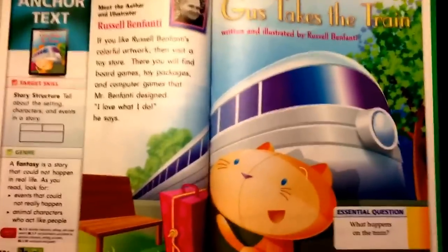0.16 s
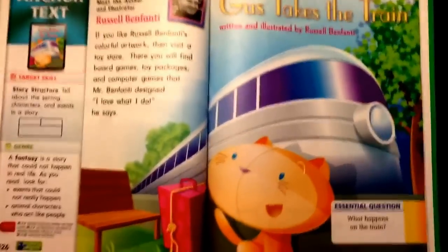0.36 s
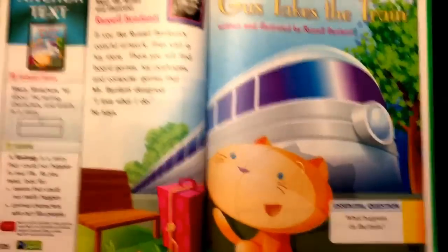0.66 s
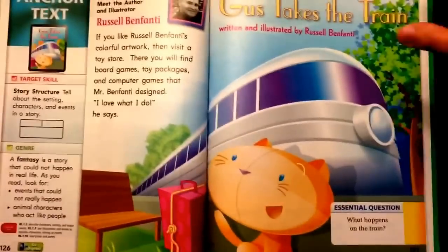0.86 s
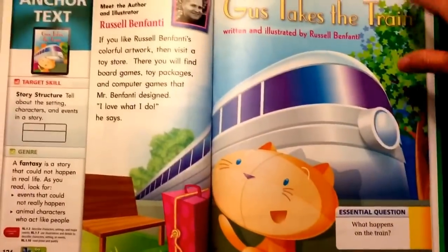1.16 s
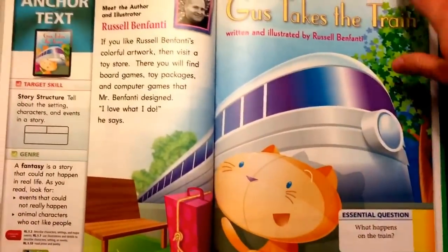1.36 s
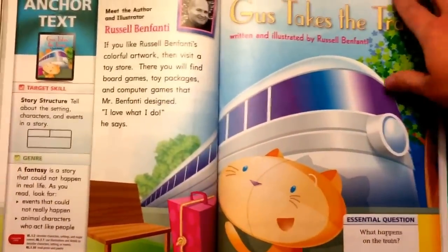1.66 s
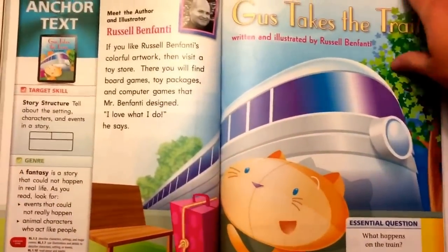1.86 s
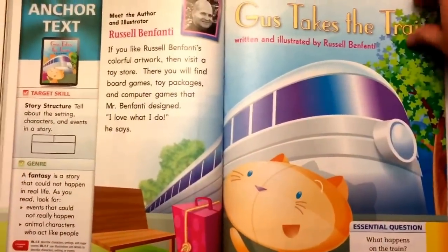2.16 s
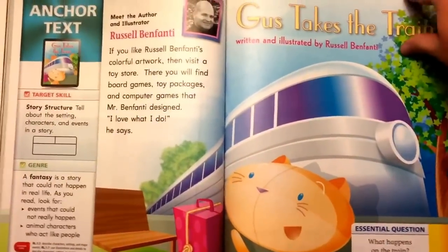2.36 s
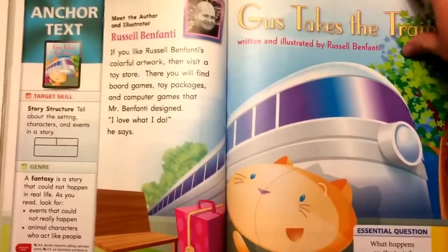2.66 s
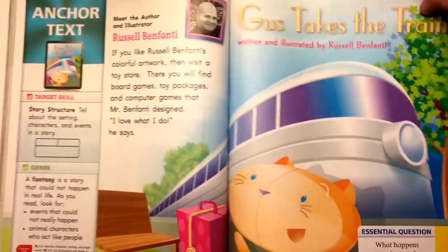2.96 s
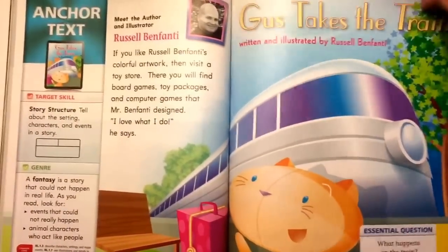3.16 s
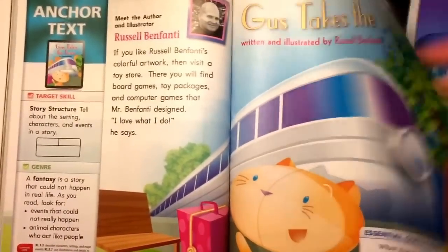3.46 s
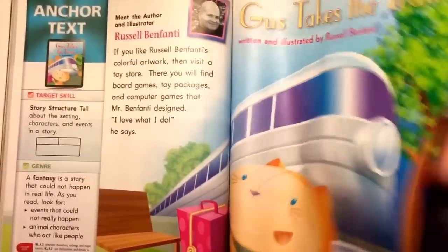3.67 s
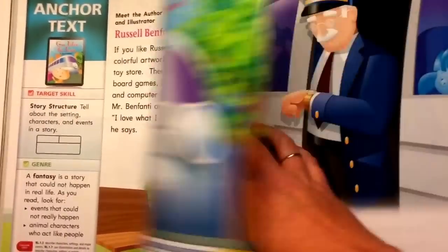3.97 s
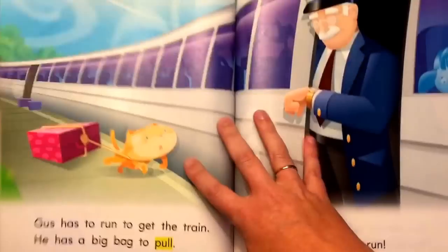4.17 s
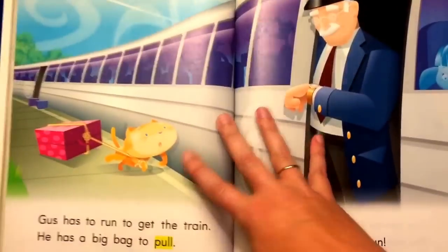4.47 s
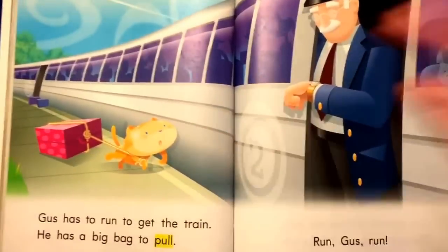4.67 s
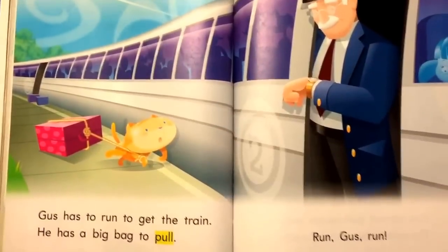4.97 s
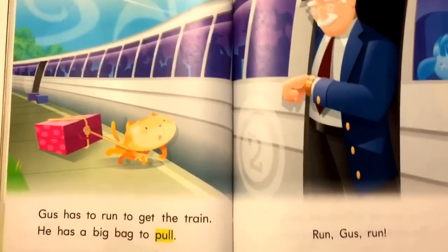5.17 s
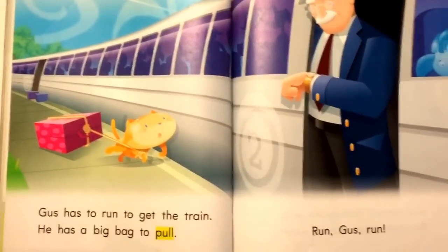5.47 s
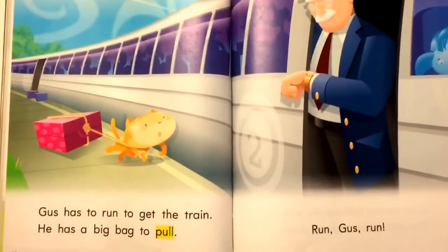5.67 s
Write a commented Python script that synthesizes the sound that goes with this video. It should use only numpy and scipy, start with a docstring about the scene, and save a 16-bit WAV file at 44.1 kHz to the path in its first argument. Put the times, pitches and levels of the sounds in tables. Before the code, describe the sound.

In a quiet room, fingers tap and rub a book, then one glossy page lifts, crackles and swings over with dull air whumps.

```python
"""A low rumble and a faint hum of a quiet room come first, with soft handling bumps and one dry knock.
Close to a hand-held camera, fingers then flick, tap and rub a schoolbook, and one glossy page is turned:
it lifts, buckles, swings over with two dull whumps of air and lands, and the palm smooths it and lets go;
the casing creaks near the end. Paper is crackling noise shaped by sheet and rubbing spectra, the book
damped modes, the thuds short low sines, the rumble filtered noise and the hum a sine."""
import sys
import numpy as np
from scipy import signal
from scipy.fft import rfft, irfft
from scipy.io import wavfile
from scipy.ndimage import map_coordinates

SR = 44100
rng = np.random.default_rng(int(sys.argv[2]) if len(sys.argv) > 2 else 0)


def bounce(signal):
    """Save signal as a 16-bit WAV file at the path given by the first command-line argument."""
    frames = np.transpose(np.atleast_2d(signal))
    limited = np.clip(frames, -1, 1)
    pcm = np.round(limited * 32767).astype(np.int16)
    wavfile.write(sys.argv[1], SR, pcm)


N = 256220
TIME = np.arange(N) / SR  # s

# resonances of the flat sheet at rest: frequency_hz, relative_density_db
SHEET_SPECTRUM = [(50, -14.5), (170, -14.5), (320, -18.5), (470, -19.5), (750, -11.5), (1200, -7.5),
                  (1600, -4), (1950, -1), (2650, -5.5), (3200, -16), (4000, -24), (7000, -39),
                  (11000, -51.5), (16000, -57)]
# hiss of rubbed paper: frequency_hz, relative_density_db
RUB_SPECTRUM = [(100, -21.5), (250, -13.5), (470, -19), (800, -10.5), (1400, -16), (2700, -11.5),
                (3700, -17.5), (5000, -5.5), (6500, 0.5), (8300, -1.5), (10100, -16.5), (12500, -13.5),
                (16000, -17.5)]
SHEET_HZ, RUB_HZ = 1900, 6500  # reference pitches of the two spectra


def undb(db):
    """Decibels to gain."""
    return 10 ** (np.asarray(db) / 20)


def add(track, start, sound):
    """Mix a sound into the track from a given time in seconds."""
    i = max(int(start * SR), 0)
    track[i:i + len(sound)] += sound[:N - i]


def walk(n, rate):
    """A smooth random wander with a spread near 1, taking rate steps a second."""
    steps = rng.standard_normal(2048)
    return np.interp(np.arange(n) * rate / SR, np.arange(len(steps)), steps)


def swell(peak, rise_ms, fall_ms):
    """Start time and envelope of an exponential rise and fall, 20 dB in each given time."""
    rise, fall = rise_ms / 1000, fall_ms / 1000
    t = np.arange(-2 * rise, 2 * fall, 1 / SR)
    return peak + t[0], undb(20 * np.minimum(t / rise, -t / fall))


def colour(x, points, stretch=1, ripple_db=0, ripple_hz=170, size=2048):
    """Causal filter of unit energy; stretch shifts its spectrum, ripple scatters resonances over it."""
    hz, db = np.transpose(points)
    f = np.maximum(np.arange(size // 2 + 1) * SR / size, 1)
    ripple = np.interp(f / ripple_hz, np.arange(size), rng.standard_normal(size))
    gain_db = np.interp(np.log(f), np.log(hz * stretch), db) + ripple_db * ripple
    # folding the cepstrum forward gives minimum phase: the response starts at once
    cepstrum = irfft(np.log(undb(gain_db)))
    cepstrum[1:size // 2] *= 2
    cepstrum[size // 2 + 1:] = 0
    response = irfft(np.exp(rfft(cepstrum)))
    return signal.fftconvolve(x, response / np.linalg.norm(response))


def crackle(envelope, rate, spread_db):
    """Tiny slips of uneven size at random moments, rate a second, with the energy of the envelope."""
    n = len(envelope)
    signs = rng.choice([-1, 1], n)
    sizes = signs * undb(spread_db * np.minimum(rng.exponential(size=n), 4))
    happens = rng.random(n) < rate / SR
    faint_noise = 1e-3 * rng.standard_normal(n)
    slips = envelope * (sizes * happens + faint_noise)
    return slips * np.linalg.norm(envelope) / np.linalg.norm(slips)


def patches(envelope, points, stretch, rate, spread_db, uneven_db, ripple_db, flutter_hz=100, count=3):
    """Patches of paper crackle in turns, each with its own resonances; the energy follows the envelope."""
    weights = [envelope * undb(uneven_db * walk(len(envelope), flutter_hz)) for _ in range(count)]
    share = np.linalg.norm(envelope) / np.linalg.norm(weights)
    return share * sum(colour(crackle(w, rate, spread_db), points, stretch, ripple_db) for w in weights)


def background(tone_db=-61.5, waver_db=3.0, split_hz=220, hum_hz=259.5, hum_db=-74):
    """Wavering building rumble, smooth thin hiss and the slightly wandering hum of an appliance."""
    # room tone: frequency_hz, relative_density_db
    tone_spectrum = [(20, -41), (31, -26.5), (42, -12), (58, -1), (90, -1), (120, -12), (160, -9.5),
                     (205, -15.5), (275, -17.5), (400, -27.5), (800, -33.5), (2200, -35), (7500, -41),
                     (16000, -47)]
    tone = undb(tone_db) * colour(rng.standard_normal(N), tone_spectrum, size=16384)[:N]
    rumble = signal.sosfiltfilt(signal.butter(2, split_hz, fs=SR, output="sos"), tone)
    hiss = tone - rumble
    hum_gain = undb(hum_db + 1.3 * walk(N, rate=5)) * np.sqrt(2)  # from rms to peak
    hum = hum_gain * np.sin(2 * np.pi * hum_hz * TIME)
    return hiss + rumble * undb(waver_db * walk(N, rate=11)) + hum


def thuds(cycles=0.79):
    """Short low thuds: soft handling bumps, and two dull whumps of air pushed by the turning page."""
    # handling bumps, and page whumps at 3.385 and 3.666 s: centre_s, envelope_peak_db, pitch_hz
    low_thuds = [(.115, -49, 131), (.293, -46, 71), (0.543, -41.5, 54.6), (1.748, -48, 93),
                 (3.385, -42, 149), (3.666, -40.5, 165), (5.05, -51, 60)]
    out = np.zeros(N)
    for centre, db, hz in low_thuds:
        t = TIME - centre
        envelope = np.exp(-(t * hz / cycles) ** 2)  # leaves a cycle or two
        out += undb(db) * envelope * np.sin(2 * np.pi * hz * t)
    return out


def knock(at=.358, db=-38, rise_ms=2.3, fall_ms=3, note_hz=1000, note_db=-42, note_t60=0.035):
    """One dry handling click, bright on top, with a short hollow note decaying 60 dB in note_t60 s."""
    # the dry knock: frequency_hz, relative_density_db
    knock_spectrum = [(300, -3), (480, -15), (750, -6), (1000, -2), (1350, -12), (2150, -11), (3500, -3.5),
                      (4400, -8), (5200, -14), (6800, -1.5), (8800, 2), (11000, -9), (12500, -20),
                      (16000, -23)]
    out, t = np.zeros(N), TIME[:SR // 10]
    start, force = swell(at, rise_ms, fall_ms)
    add(out, start, undb(db) * colour(crackle(force, rate=14000, spread_db=2.0), knock_spectrum))
    note = np.exp(-np.log(1000) * t / note_t60) * np.sin(2 * np.pi * note_hz * t)
    add(out, at, undb(note_db) * note)
    return out


def ticks(scrape_hz=6350, rise_ms=3.5):
    """A nail or page edge catches and slips free in a brief scrape that also shakes the sheet."""
    # catches and flicks: peak_s, level_db, fall_by_20_db_ms, sheet_relative_to_scrape_db
    flicks = [(.528, -68, 10, -14), (1.556, -54, 6, -27), (1.617, -70, 6, 8), (1.882, -41, 3, -14),
              (2.0672, -38.5, 8, -2), (2.4629, -47.5, 13, -4.5), (2.62, -49, 5, 0), (2.83, -48.5, 24, -0.5),
              (2.962, -35, 40, -14), (3.283, -52, 4, 4), (3.581, -52, 8, -2), (3.8367, -37, 5.5, -5.5),
              (4.508, -49, 1.5, 1)]
    out = np.zeros(N)
    for peak, db, fall_ms, sheet_db in flicks:
        start, force = swell(peak, rise_ms, fall_ms)
        scrape = colour(crackle(force, rate=14000, spread_db=3.5), RUB_SPECTRUM, stretch=scrape_hz / RUB_HZ)
        sheet = colour(crackle(force, rate=7800, spread_db=-0.5), SHEET_SPECTRUM, stretch=1.033)
        add(out, start, undb(db) * (scrape + undb(sheet_db) * sheet))
    return out


def taps(contact_s=0.0019, pitch_scatter=.02):
    """A soft fingertip rings the damped modes of the book, a little differently at each tap."""
    # fingertips land on the block of pages: start_s, peak_db
    landings = [(1.588, -53.5), (1.615, -58), (1.988, -52.5), (2.068, -45.5), (2.095, -52.5),
                (2.481, -39.5), (2.506, -50), (2.619, -52), (2.685, -43), (2.815, -47), (3.213, -44),
                (4.508, -46.5)]
    # modes of the open book before the pitch scatter: pitch_hz, relative_level_db, t60_s
    book_modes = [(354, -7.5, .06), (713, -1.5, 0.04), (755, 0, 0.037), (1156, -8.5, 0.025),
                  (1876, -13, .02), (2190, -12.5, .015)]
    out, t = np.zeros(N), TIME[:SR // 5]
    for start, db in landings:
        pitch = 1 + pitch_scatter * rng.standard_normal()
        ring = np.zeros(len(t))
        for hz, gain_db, t60 in book_modes:
            decay = undb(gain_db - 60 * t / t60)
            ring += decay * np.sin(2 * np.pi * (hz * pitch * t + rng.random()))
        ring = ring * (1 - np.exp(-t / contact_s))  # the soft skin blunts the onset
        add(out, start, undb(db) * ring / np.abs(ring).max())
    return out


def slides(grip_ms=9, release_ms=13, hiss_hz=6650, tremor_db=1.15, tremor_hz=45):
    """Paper fibres stick and slip as the pressure swells and eases; the hiss also shakes the sheet."""
    # skin or page edge over paper: start_s, firmest_s, end_s, firmest_level_db, lighter_at_both_ends_db
    strokes = [(1.81, 1.875, 1.895, -65, 12), (2.012, 2.06, 2.075, -63, 4.5),
               (2.362, 2.385, 2.42, -58, 3.5), (2.415, 2.46, 2.468, -44, 15.5),
               (2.584, 2.587, 2.594, -61, 6), (2.605, 2.618, 2.626, -50, 9), (2.705, 2.718, 2.745, -63, 10),
               (2.772, 2.825, 2.85, -51, 16.5), (2.835, 2.85, 2.902, -54.5, 4),
               (2.97, 2.98, 3.185, -54, 4.5), (3.278, 3.285, 3.452, -55.5, 5), (3.509, 3.53, 3.56, -58, 2),
               (3.585, 3.67, 3.71, -54, 7), (3.72, 3.795, 3.816, -45.5, 13), (4.035, 4.092, 4.12, -62.5, 8),
               (4.19, 4.218, 4.28, -63.5, 9), (4.455, 4.51, 4.56, -65, 10)]
    press_power = 1.2  # shape of the pressure about the firmest moment
    lift_s = 2.95  # the page comes free of the block
    flat_sheet_db, loose_sheet_db = -13, -1.5  # sheet relative to hiss, before and after the lift
    out = np.zeros(N)
    grip, release = grip_ms / 1000, release_ms / 1000
    for start, firmest, end, db, lighter_db in strokes:
        t = np.arange(start - grip, end + release, 1 / SR)
        contact = np.interp(t, [t[0], start, end, t[-1]], [0, 1, 1, 0]) ** 2
        easing = np.interp(t, [start, firmest, end], [1, 0, 1]) ** press_power
        tremor = tremor_db * walk(len(t), tremor_hz)
        force = contact * undb(db - lighter_db * easing + tremor)
        hiss = patches(force, RUB_SPECTRUM, hiss_hz / RUB_HZ, rate=3000, spread_db=3.5,
                       uneven_db=3.5, ripple_db=3)
        sheet = patches(force, SHEET_SPECTRUM, 1.09, rate=1200, spread_db=1.0, uneven_db=2.0, ripple_db=1)
        sheet_db = flat_sheet_db if start < lift_s else loose_sheet_db
        add(out, t[0], hiss + undb(sheet_db) * sheet)
    return out


def curl(t):
    """Pitch ratio of the sheet to its rest: higher when tightly curved, sinking as it relaxes."""
    # curl of the turning page, as pitch against SHEET_HZ: time_s, pitch_hz
    curl_path = [(2.98, 2503), (3.11, 1620), (3.23, 1602), (3.39, 1948), (3.58, 1680), (3.69, 1949),
                 (3.85, 2120), (3.91, 1700), (4.04, 1350), (4.12, 2800), (4.25, 1800)]
    return np.interp(t, *np.transpose(curl_path)) / SHEET_HZ


def crinkle(strain):
    """Bright, fine crackle of the glossy coating."""
    # crinkling coating: frequency_hz, relative_density_db
    crinkle_spectrum = [(500, -14), (2800, -1.5), (3800, -0.5), (6200, -4.5), (8200, -8.5), (10300, -24.5),
                        (12500, -28.5), (16000, -32)]
    return patches(strain, crinkle_spectrum, 1.0, rate=1400, spread_db=3, uneven_db=6.0, ripple_db=3.5)


def rustle(flutter_db=1.5, flutter_hz=60, crinkle_db=-18):
    """The moving sheet gives way in a fluttering run of tiny buckles; its resonances glide with the curl."""
    # sheet lifted, drawn up, swung over and settling, before the flutter: time_s, level_db
    motion = [(2.952, -84.5), (2.966, -46.5), (3.065, -52), (3.115, -31), (3.19, -58), (3.372, -68),
              (3.394, -42), (3.465, -62), (3.545, -60), (3.625, -50.5), (3.672, -28.5), (3.73, -50.5),
              (3.81, -48), (3.86, -31), (3.92, -44), (3.955, -48), (3.985, -55.5), (4.17, -77)]
    out, (times, db) = np.zeros(N), np.transpose(motion)
    t = np.arange(times[0], times[-1], 1 / SR)
    strain = undb(np.interp(t, times, db) + flutter_db * walk(len(t), flutter_hz))
    place = np.cumsum(curl(t))  # reading the steady crackle faster raises its pitch
    steady = np.ones(int(place[-1]) + 1)
    body = patches(steady, SHEET_SPECTRUM, 0.99, rate=1600, spread_db=2.2, uneven_db=4, ripple_db=4)
    gliding = strain * map_coordinates(body, [place])
    add(out, t[0], gliding + undb(crinkle_db) * crinkle(strain)[:len(t)])
    return out


def buckles(rise_ms=6):
    """A whole stretch of the sheet gives way at once and flutters to rest."""
    # sudden buckles: peak_s, level_db, fall_by_20_db_ms, crinkle_relative_to_body_db
    collapses = [(3.087, -36, 28, -16), (3.112, -33, 50.5, -20), (3.214, -45, 35, -28),
                 (3.245, -46.5, 25, -20), (3.383, -28.5, 45, -12.5), (3.512, -44, 50, -22),
                 (3.556, -34, 54, -29), (3.604, -34.5, 44, -27), (3.638, -31, 80, -20),
                 (3.678, -27, 20, -18), (3.808, -33.5, 90, -32), (3.8375, -25, 26, -4),
                 (3.866, -27, 32, -16), (4.12, -62, 22, -10), (4.246, -44.5, 26, -35),
                 (4.26, -43.5, 23, -30)]
    out = np.zeros(N)
    for peak, db, fall_ms, crinkle_db in collapses:
        start, strain = swell(peak, rise_ms, fall_ms)
        body = patches(strain, SHEET_SPECTRUM, curl(peak), rate=2200, spread_db=1.55,
                       uneven_db=3, ripple_db=4.5)
        add(out, start, undb(db) * (body + undb(crinkle_db) * crinkle(strain)))
    return out


def snaps(lag_ms=0.38):
    """One crease flips at once: a sharp crack, and a bending wave whose low notes arrive late."""
    # creases popping through: start_s, level_db (rms with the energy spread over 5 ms), crack_relative_db
    creases = [(3.085, -31, -4.5), (3.0936, -27, -25), (3.1128, -24, -10.5), (3.128, -37, -28.5),
               (3.3793, -34, -5), (3.3835, -27.5, -9), (3.509, -46.5, -8.5)]
    # a popping crease: frequency_hz, relative_density_db
    crack_spectrum = [(500, -30), (2500, -4), (3800, 1), (6200, 2), (8300, -3), (10300, -19.5),
                      (12500, -12), (16000, -15.5)]
    out = np.zeros(N)
    pulse = np.sqrt(.005 * SR)
    khz = np.arange(257) * SR / 512 / 1000
    # the delay is lag_ms at 1 kHz and falls as 1 / sqrt(frequency)
    wave = pulse * irfft(np.exp(-4j * np.pi * lag_ms * np.sqrt(khz)))
    for start, db, crack_db in creases:
        add(out, start, undb(db) * colour(wave, SHEET_SPECTRUM, ripple_db=6.5))
        add(out, start, undb(db + crack_db) * colour(wave, crack_spectrum, ripple_db=5.5))
    return out


def clicks(rise_ms=3.8):
    """The plastic camera casing creaks under the grip in brief crackles."""
    # small clicks of the camera body: peak_s, level_db, fall_by_20_db_ms
    creaks = [(5.6, -49.5, 3), (5.6038, -55.5, 16.5)]
    # the camera body: frequency_hz, relative_density_db
    casing_spectrum = [(800, -21), (1700, -8), (2400, 1), (3000, 4.5), (4600, -18.5), (6100, -3.5),
                       (7200, -21), (11000, -22.5), (14500, -9), (16000, -12)]
    out = np.zeros(N)
    for peak, db, fall_ms in creaks:
        start, force = swell(peak, rise_ms, fall_ms)
        add(out, start, undb(db) * colour(crackle(force, rate=7500, spread_db=6.0), casing_spectrum))
    return out


def room(x, wet_db=-20, t60=0.2514, treble_hz=6000, first_s=.004):
    """A small furnished room answers with a short, duller tail, falling 60 dB in t60 s."""
    t = TIME[:SR // 2]
    decay = np.exp(-np.log(1000) * t / t60)
    tail = rng.standard_normal(len(t)) * decay * (t > first_s)
    tail = signal.sosfilt(signal.butter(1, treble_hz, fs=SR, output="sos"), tail)
    return x + undb(wet_db) * signal.fftconvolve(x, tail / np.linalg.norm(tail))[:N]


def scene():
    """The page, fingers and casing in the room; knock, thuds and background join without its tail."""
    handling = ticks() + taps() + slides() + rustle() + buckles() + snaps() + clicks()
    return (background() + thuds() + knock() + room(handling))[None]


def record(dry, bass_hz=36, top_hz=15950):
    """The small microphone loses the deepest bass, and the camera cuts the top."""
    thin = signal.sosfilt(signal.butter(2, bass_hz, "highpass", fs=SR, output="sos"), dry)
    return signal.sosfilt(signal.ellip(10, .2, 70, top_hz, fs=SR, output="sos"), thin)


dry = scene()
out = record(dry)
bounce(out)
```